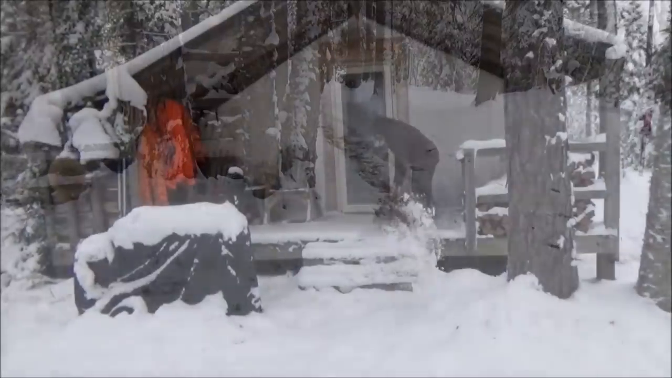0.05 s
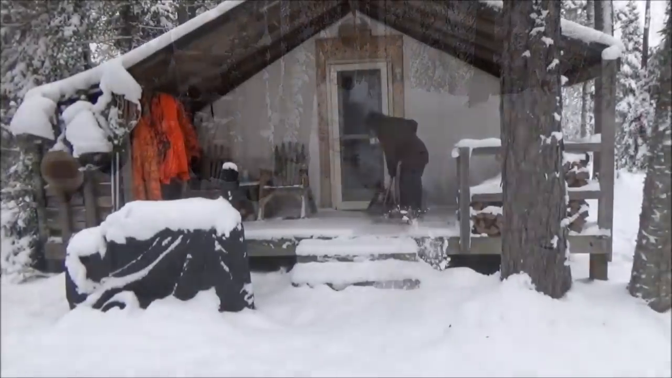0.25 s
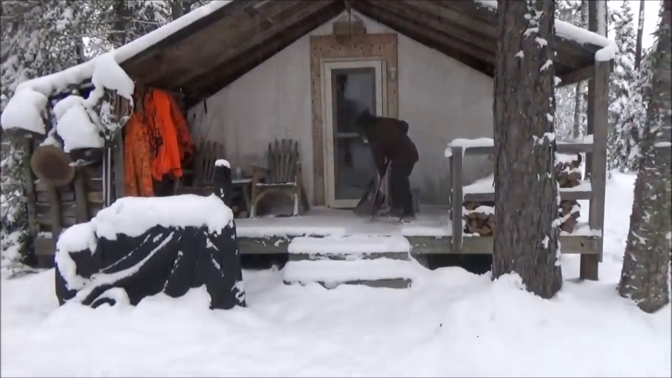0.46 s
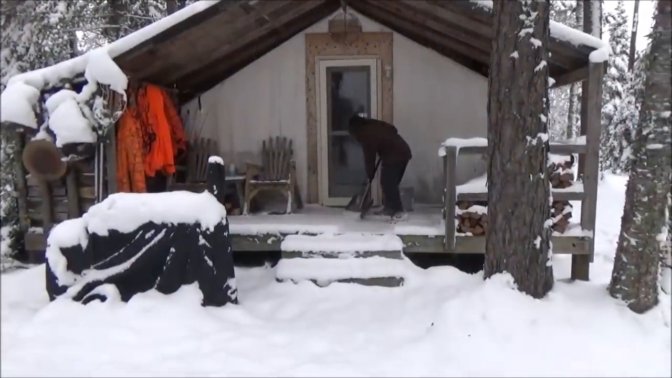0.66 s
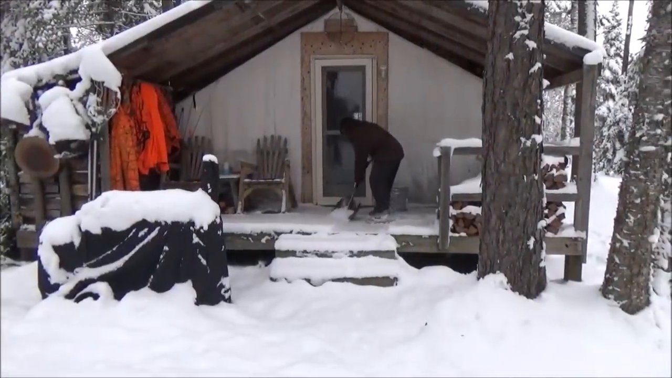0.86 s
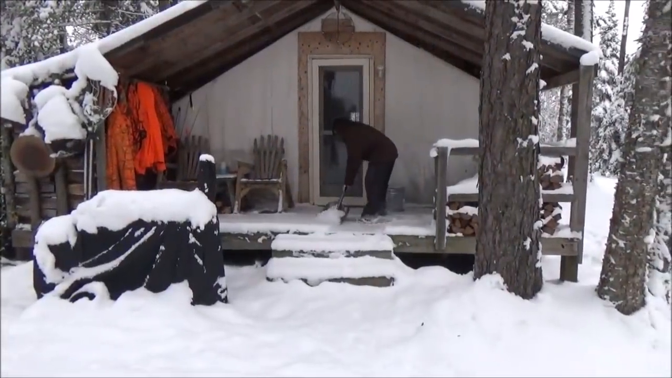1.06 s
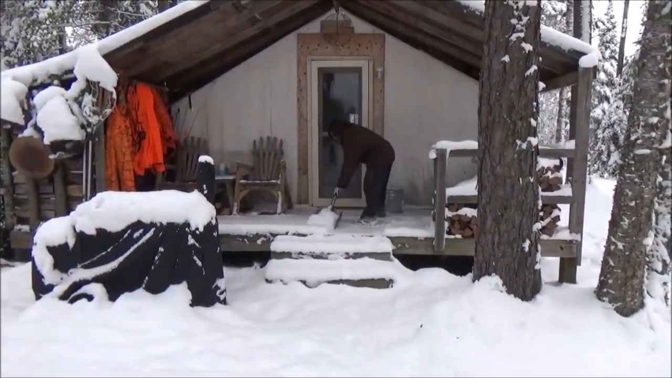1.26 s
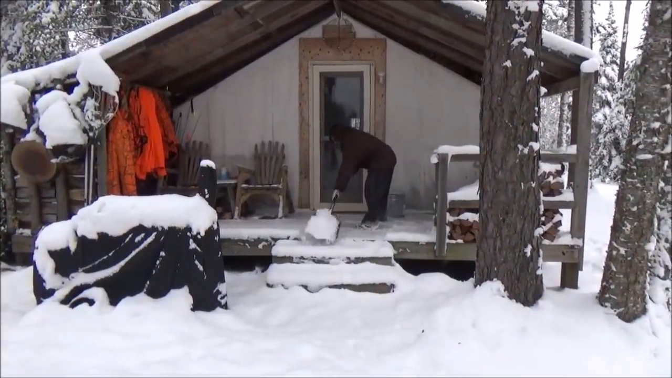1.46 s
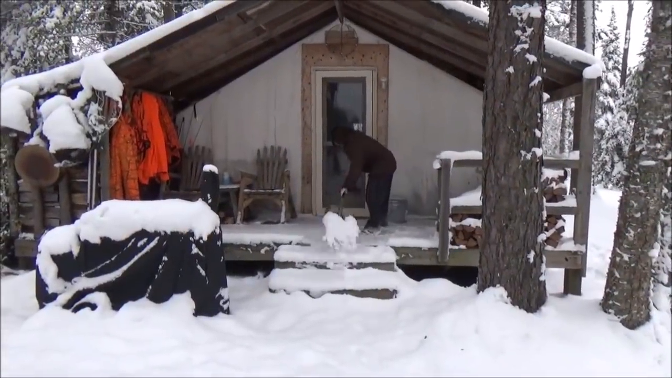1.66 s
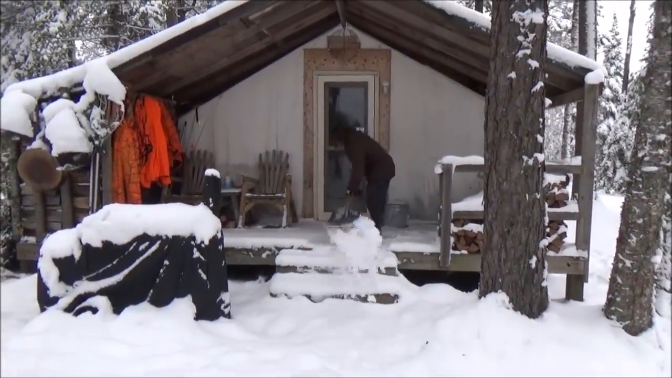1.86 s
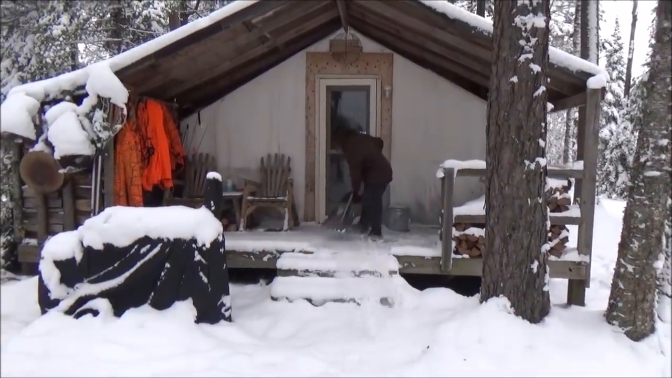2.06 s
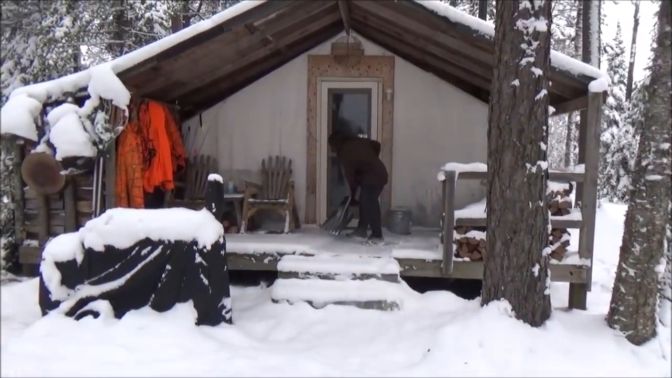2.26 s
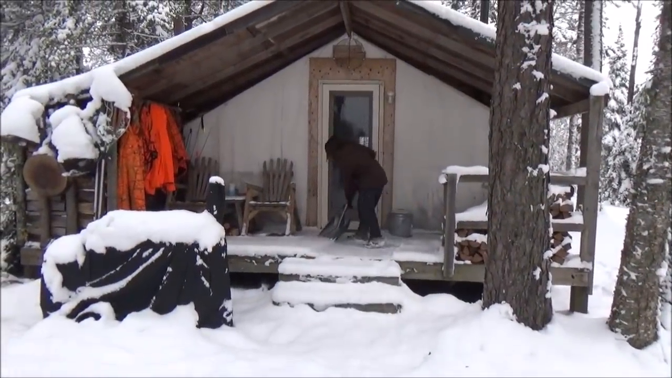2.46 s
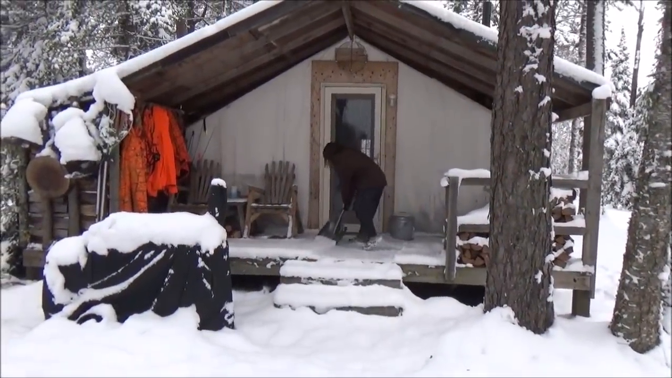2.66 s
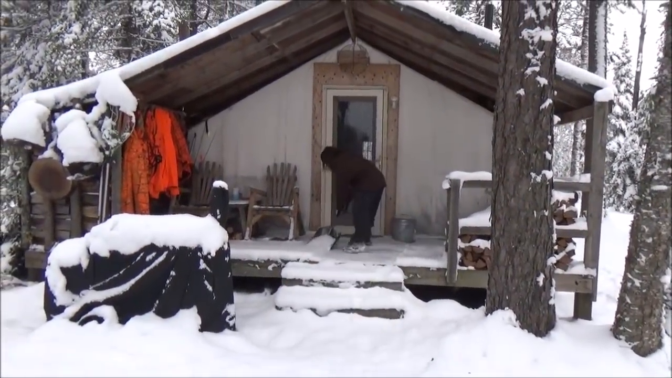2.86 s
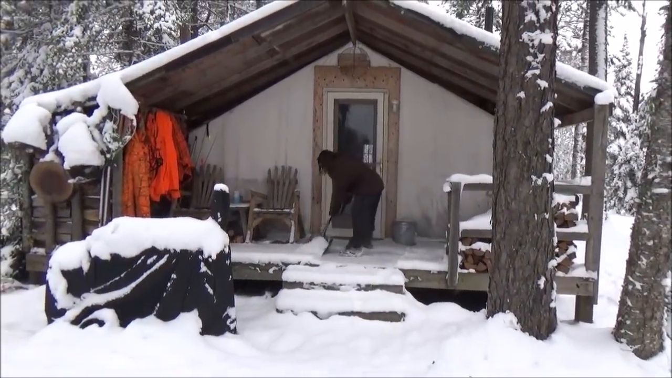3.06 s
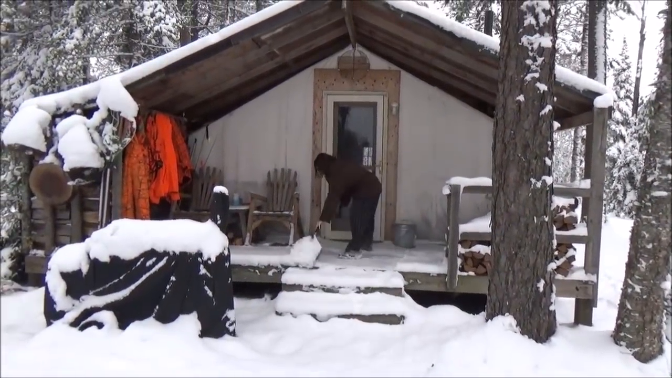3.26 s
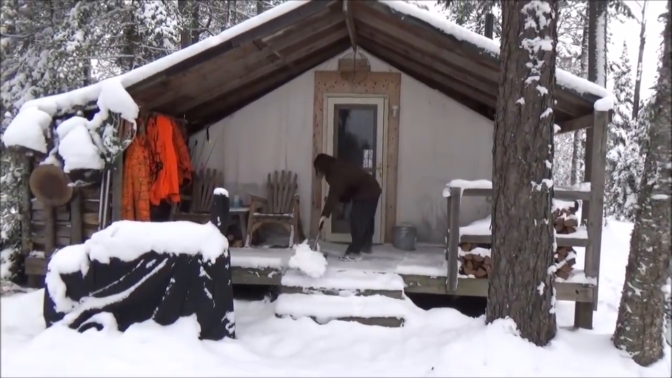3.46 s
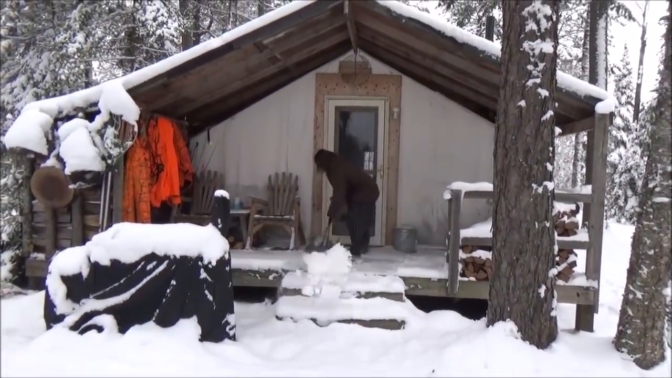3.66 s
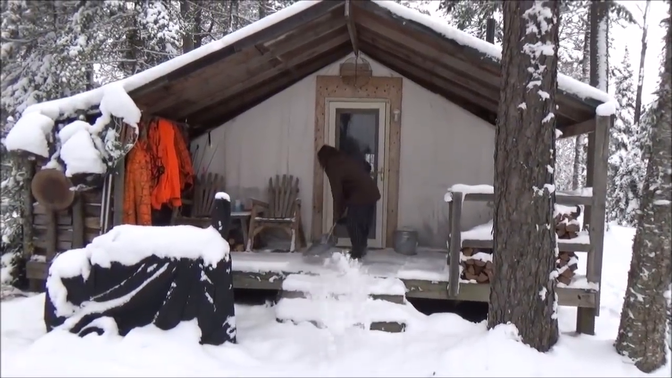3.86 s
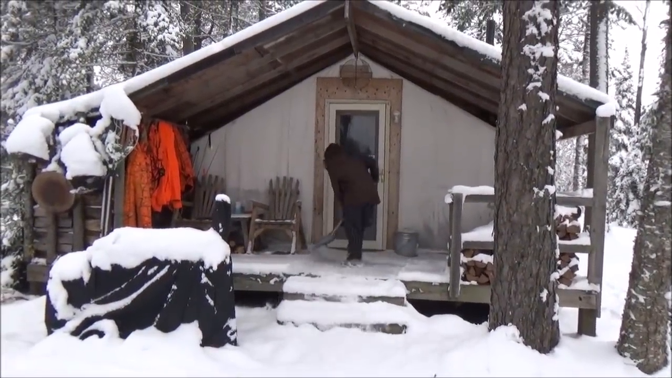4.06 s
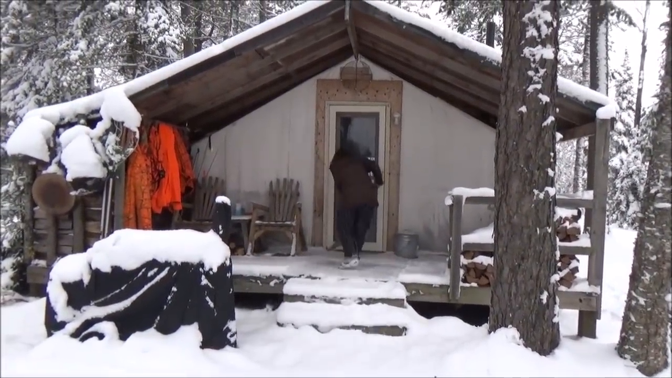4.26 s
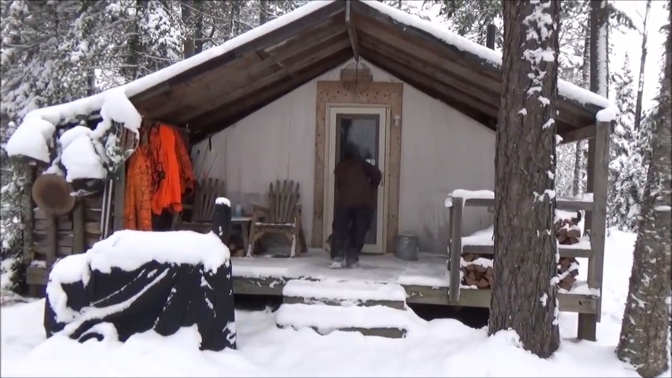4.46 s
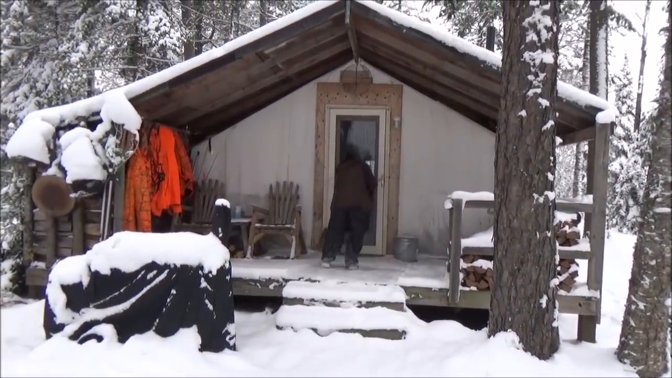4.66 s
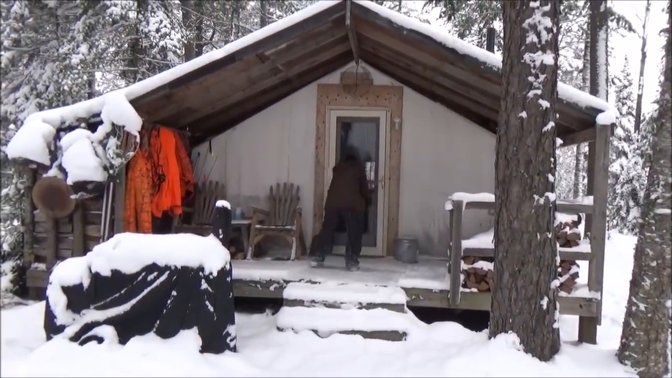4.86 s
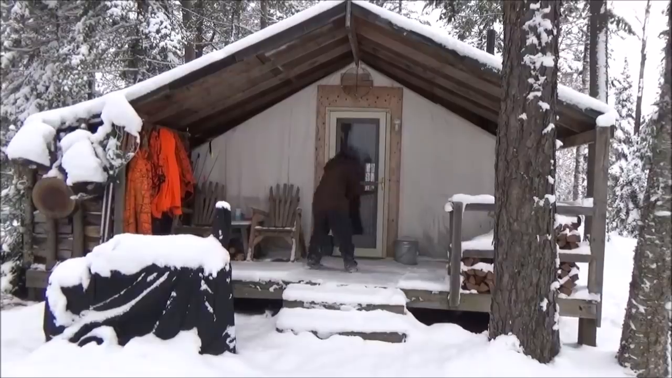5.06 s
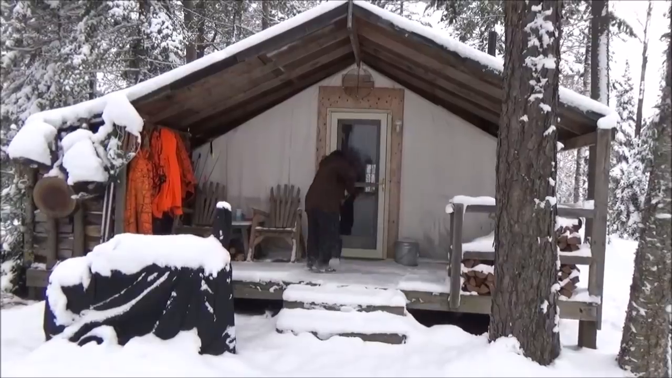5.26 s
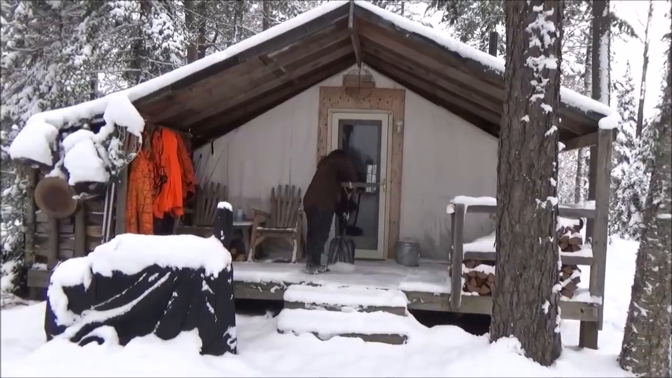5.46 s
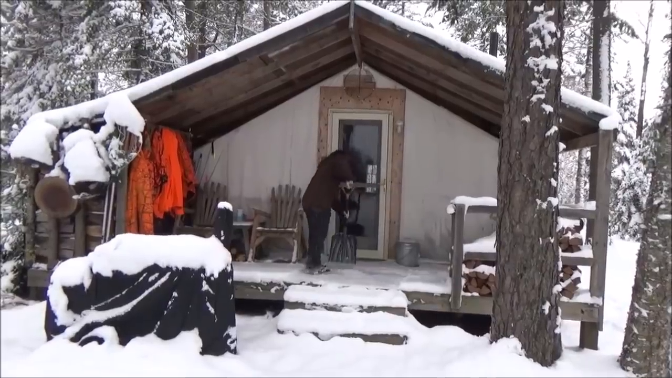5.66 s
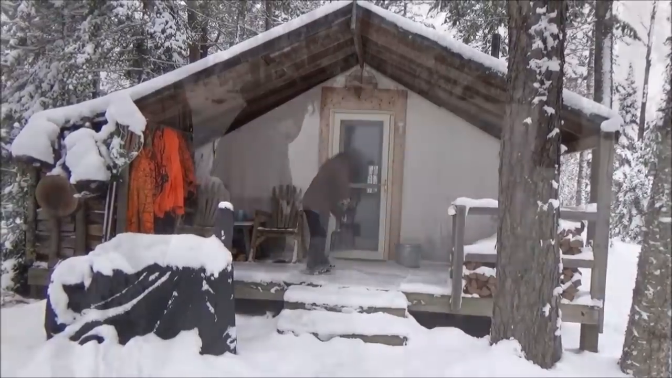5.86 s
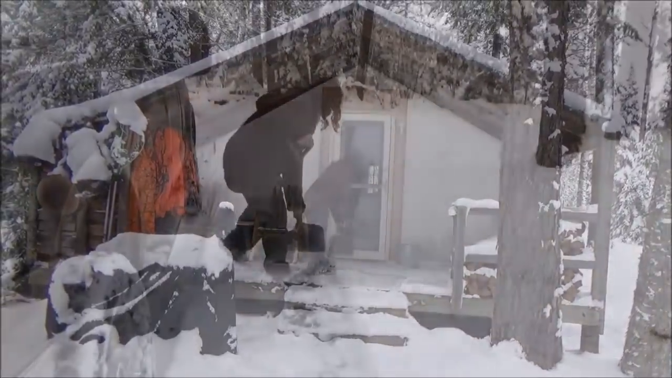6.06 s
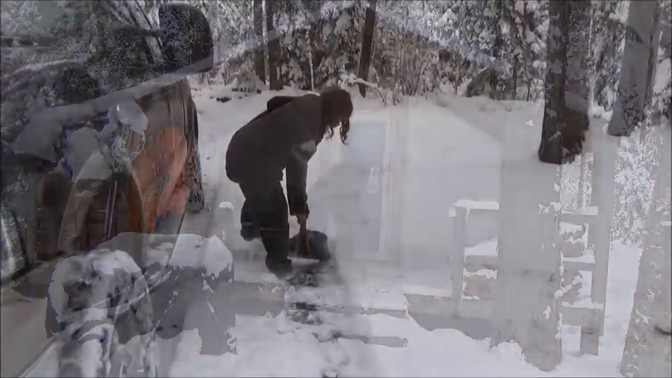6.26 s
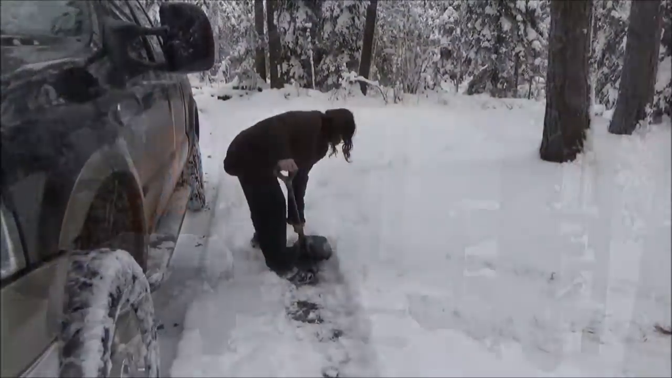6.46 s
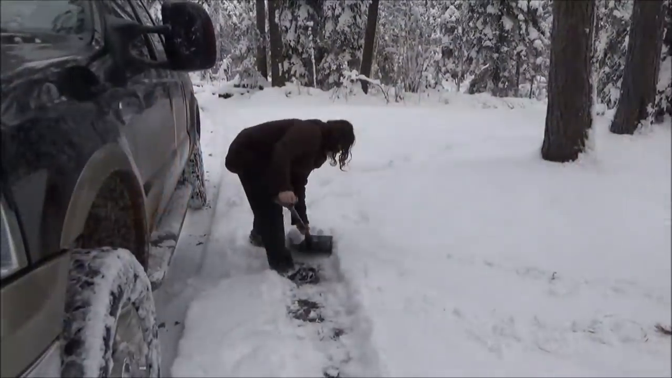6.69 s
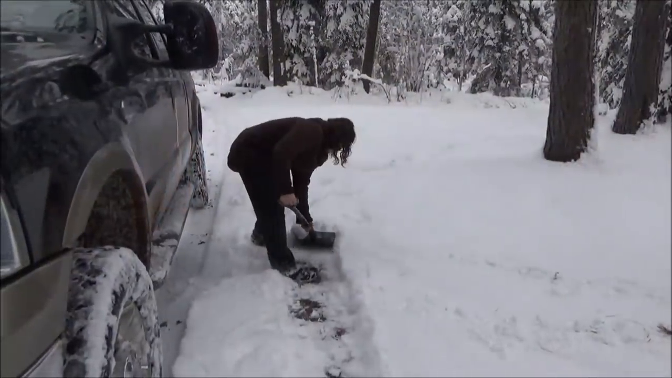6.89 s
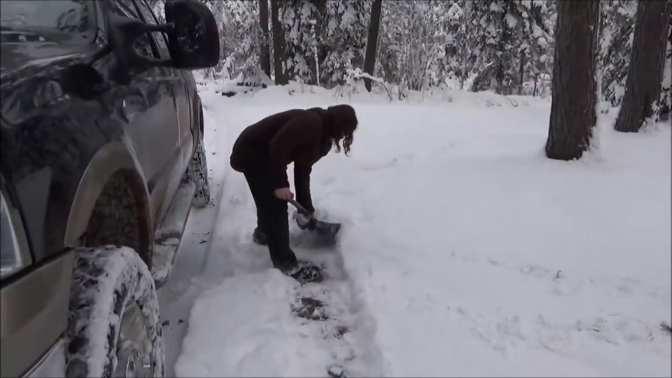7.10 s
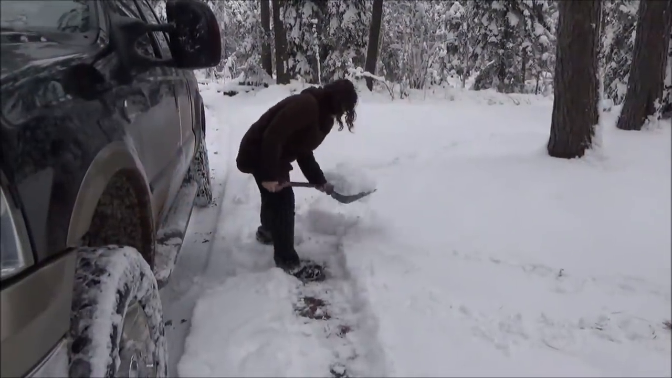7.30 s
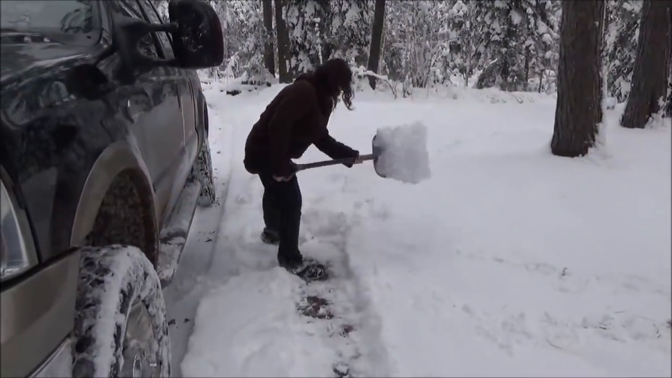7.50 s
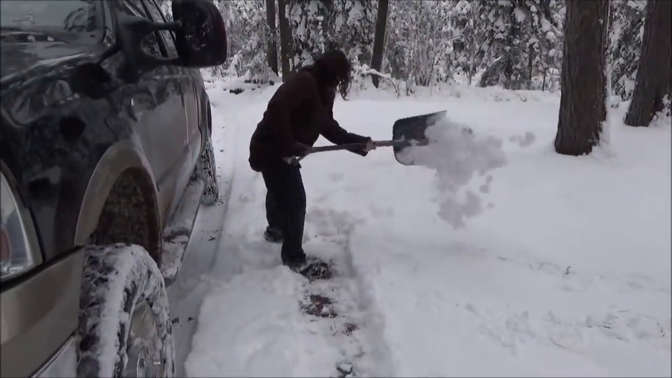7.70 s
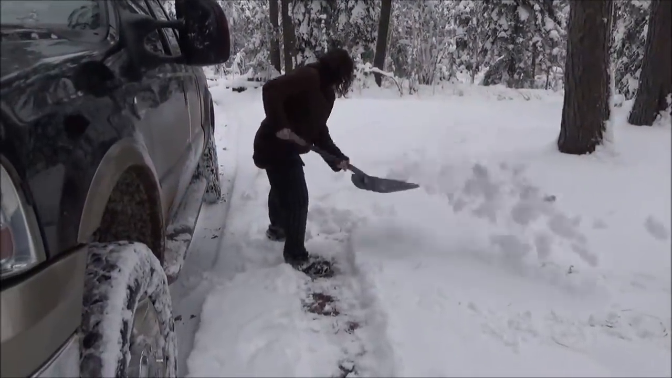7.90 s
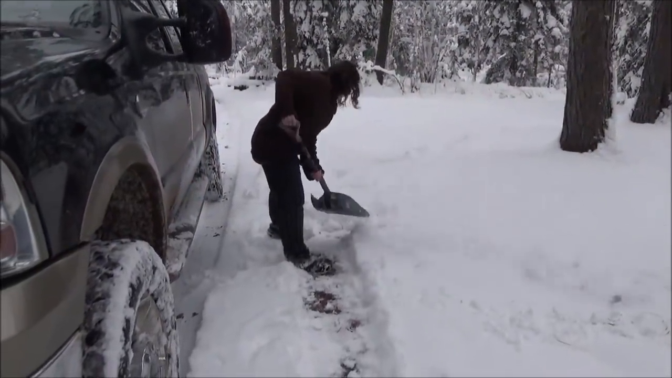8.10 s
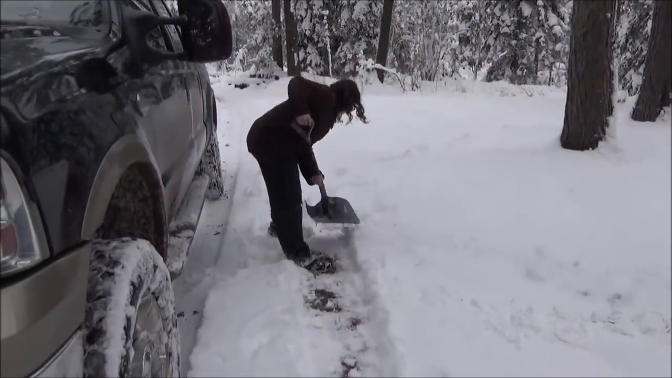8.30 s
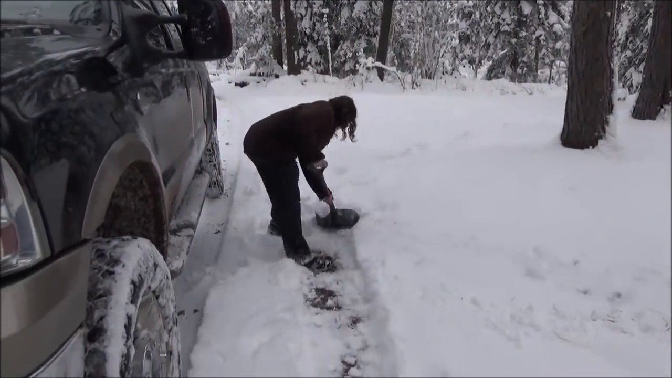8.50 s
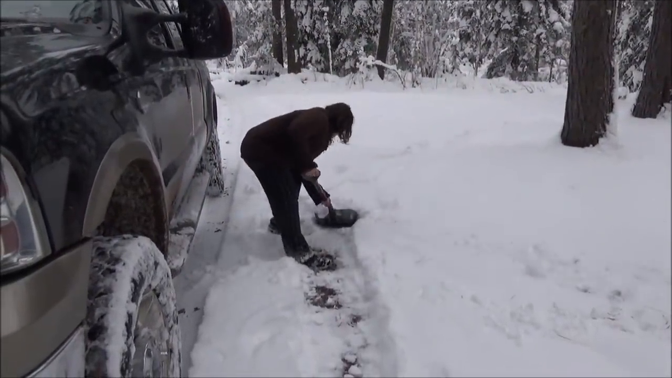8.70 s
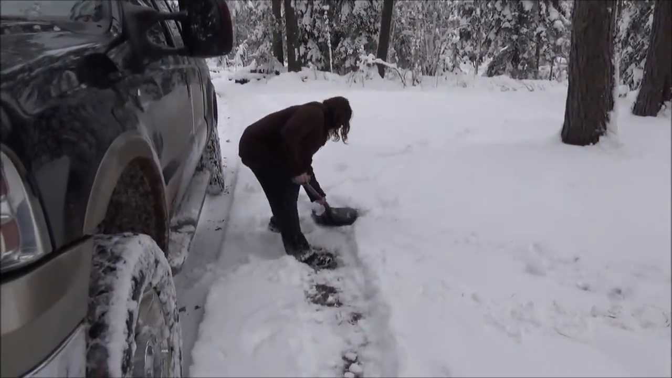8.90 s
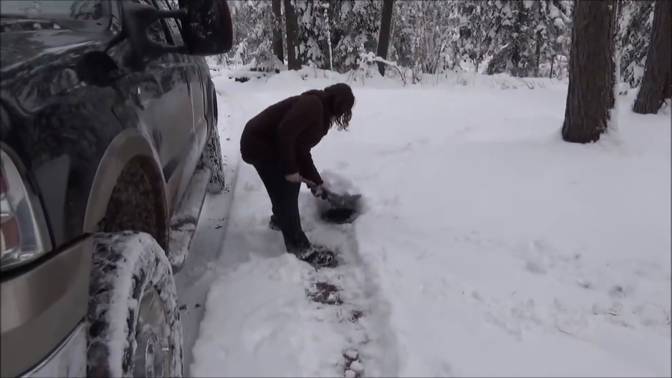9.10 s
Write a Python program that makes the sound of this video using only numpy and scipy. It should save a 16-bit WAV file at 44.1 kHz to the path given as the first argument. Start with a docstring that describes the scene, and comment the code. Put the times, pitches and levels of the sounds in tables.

```python
"""Snow shovel on porch boards

A shovel is pushed over the boards in four juddering strokes, then stabbed into loose snow. Pressure on the edge
sets the level of crushing ice grains and of the noise that rings modes of blade and deck. Between strokes, grain
noise swells as snow slides and boots shuffle; knocks ring board modes, ice crust snaps in noise bursts, wind hums
and gusts on the microphone, a faint camera part ticks from 6.4 s on, and air and recorder hiss lie below."""
import sys
import numpy as np
from scipy import signal
from scipy.fft import rfft, irfft, next_fast_len
from scipy.io import wavfile

SR = 44100
rng = np.random.default_rng(int(sys.argv[2]) if len(sys.argv) > 2 else 0)


def to_wav(sig):
    """Store sig (one row per channel, or 1-D mono) as 16-bit WAV at the path in sys.argv[1].

    Samples outside -1..1 are clipped; the rate is SR.
    """
    pcm = np.clip(np.atleast_2d(sig), -1, 1) * 32767
    pcm = np.round(pcm).astype(np.int16)
    wavfile.write(sys.argv[1], SR, pcm.T)  # frames by channels


N = 403019

# blade modes under friction: mode_hz, width_hz, rel_db
BLADE_MODES = [(349, 30, -7.5), (392.5, 56, -1.5), (422.7, 28.2, 6.5), (456.7, 31, 0.5), (507, 35, -6.5)]
# higher, duller blade modes: mode_hz, width_hz, rel_db
SCOOP_MODES = [(526, 59, 0.5), (666.5, 83, 4.5), (730, 120, 4), (885, 400, -11.5)]


def shovel():
    """The pressure on the edge sets the crushing of grains and the noise that rings blade and deck."""
    # one table a stroke: time_s, steady_scrape_db, rel_treble_db
    strokes = [
        [(0.54, -65, 22.5), (0.608, -44.5, 1.5), (0.758, -23.5, -3), (0.854, -24.5, -2.5), (1.228, -27.5, -1),
         (1.278, -21.5, 3.5), (1.398, -20.5, 0), (1.5, -44.5, -26)],
        [(2.45, -46.5, 8.5), (2.522, -39.5, 1), (2.646, -27.5, -1.5), (2.744, -22, -2), (3.166, -23.5, 1.5),
         (3.294, -30, 3), (3.38, -56, -1)],
        [(4.805, -41, 4), (4.861, -42, -3.5), (4.979, -30.5, -1), (5.397, -18, -6.5), (5.437, -42, -4),
         (5.557, -26.5, -9), (5.639, -42.5, -37), (5.72, -59, -22)],
        [(6.21, -71, 2.5), (6.272, -35.5, -5), (6.394, -28, 2), (6.576, -14, -3.5), (6.632, -12.5, -1.5),
         (6.734, -30.5, 3.5), (6.884, -29.5, -2.5), (6.98, -63, -5.5)],
        [(8.375, -51.5, 12), (8.533, -31, 8), (8.62, -64, 12)],
    ]
    # drive of the bodies against the scrape, a row a stroke: ring_db, scoop_db, boom_db, fullest_ring_s
    stroke_body = [(-0.5, 6, -7, 0.88), (0.5, 7.5, -4, 2.77), (6.5, 5, 4.5, 5.64), (3, 4, 4, 6.53),
                   (-11.5, -7, 1.5, 8.5)]
    # freer ringing under a light push, dB per dB of push below firm: blade, scoop, deck
    freer_db_per_db = (0.25, 0.067, 0.19)
    # ring lost per second away from the fullest moment, dB/s: blade, scoop
    ring_loss_db_per_s = (11, 2.5)
    # crushing spectrum: freq_hz, rel_db_per_hz
    grit_spectrum = [(60, 9.5), (150, -13), (300, -17.5), (600, -8.5), (1000, -8.5), (2240, -10),
                     (2970, -9.5), (5840, -13), (9400, -12.5), (11500, -19.5)]
    # upper edge modes: mode_hz, width_hz, rel_db
    edge_modes = [(1062, 20, 6), (1200, 130, -12), (1790, 410, 0.5), (2642, 19, 5), (2840, 270, -3),
                  (3430, 36, -30), (9160, 960, 1.5)]
    # board modes: mode_hz, width_hz, rel_db
    deck_modes = [(49, 21, -34), (103, 22.3, -0.5), (195, 42, -4), (314, 74, -7)]
    firm_db, edge_db, ring_base_db, scoop_base_db, boom_base_db = -30, -9, -4.5, -13.5, -16

    t = np.arange(N) / SR
    gate, steady_db, treble_db = in_time(strokes)
    # body settings switch 0.1 s after a stroke ends
    stroke = np.searchsorted([rows[-1][0] for rows in strokes[:-1]], t - 0.1)
    *body_db, fullest_s = np.transpose(stroke_body)[:, stroke]
    away_s = np.minimum(np.abs(t - fullest_s), 1)
    freer_db = np.outer(freer_db_per_db, firm_db - steady_db)
    loss_db = np.outer([*ring_loss_db_per_s, 0], away_s)
    ring_db, scoop_db, boom_db = body_db + freer_db - loss_db

    pressure, drive = edge_pressure(gate * from_db(steady_db))
    crush = pressure * grains(per_s=21000, spread_db=1)
    grit = colour(skin(crush, 253.0, 11420, count=52), grit_spectrum)
    grit += from_db(edge_db) * resonate(crush, edge_modes)
    dull = signal.sosfilt(signal.butter(1, 4000, fs=SR, output="sos"), grit)
    scrape = dull + from_db(treble_db) * (grit - dull)

    shake = np.array([drive, drive, pressure]) * rng.standard_normal((3, N))
    blade = resonate(shake[0] * from_db(ring_base_db + ring_db), BLADE_MODES)
    scoop = resonate(shake[1] * from_db(scoop_base_db + scoop_db), SCOOP_MODES)
    deck = resonate(shake[2] * from_db(boom_base_db + boom_db), deck_modes)
    return scrape + blade + scoop + deck


def edge_pressure(steady):
    """Judders and bites add power to the steady push: pressure on the grains, and drive of the blade."""
    # edge loads up and slips free: peak_s, level_db, half_power_length_ms, rel_blade_drive_db
    judders = [(0.611, -27.5, 22, 3), (0.697, -21, 25, 0), (0.737, -16, 22, -3), (0.814, -18.5, 20, 1),
               (0.852, -15.5, 19, 4), (0.911, -24.5, 20, 8), (0.987, -15.5, 30.5, -0.5),
               (1.049, -20.5, 17, -12), (1.089, -16.5, 11, -18), (1.152, -20.5, 55, -10),
               (1.221, -20.5, 47, -7), (1.348, -21, 30, -3), (2.514, -24, 23.4, 4), (2.574, -15.5, 14, 0.5),
               (2.65, -19.5, 7.3, 6.5), (2.692, -20, 20, 1.5), (2.743, -19, 47, -9), (2.817, -16, 15, -11),
               (2.866, -15, 34, -6), (2.926, -18.5, 23, -1), (2.974, -21, 14, 1), (3.019, -21.5, 16, 2.5),
               (3.117, -17.5, 24, 4.5), (3.205, -16.5, 26, 0.5), (4.886, -30, 33, -5),
               (5.222, -15, 31, -1.5), (5.297, -11.5, 22, -4.5), (5.334, -11, 4.7, -1),
               (5.357, -17, 8.6, 8), (5.416, -11.5, 18, 4.5), (5.469, -12, 34, -1.5), (5.508, -15, 24, -5),
               (5.547, -16, 12.3, -3.5), (6.388, -26.5, 36, -9), (6.495, -17.5, 13, 0),
               (6.519, -19, 10, 10), (6.565, -14.5, 18, 2), (6.667, -15, 34, -7), (6.728, -19, 73, 2.5),
               (6.846, -21, 23, 4), (8.526, -26, 4, 0.1)]
    # edge bites down at once, lets go slowly: peak_s, level_db, half_power_fall_ms
    bites = [(0.551, -51.5, 37), (0.675, -24, 22), (0.897, -16, 16), (2.463, -41, 57), (3.275, -25.5, 34.5),
             (4.817, -22, 16.6), (4.949, -26, 8.9), (6.22, -31, 12), (6.26, -24, 15.3), (6.43, -18.5, 25),
             (8.417, -22.5, 23), (8.472, -28, 26)]
    loading_share = 0.59  # part of a judder spent rising
    bite_rise_ms, bite_drive_db, tremble_db = 4, 2.5, 0.7

    t = np.arange(N) / SR
    power = np.array([steady ** 2] * 2)
    catches = [(s, db, loading_share * ms, (1 - loading_share) * ms, drive_db)
               for s, db, ms, drive_db in judders]
    catches += [(s, db, bite_rise_ms, ms, bite_drive_db) for s, db, ms in bites]
    for peak_s, level_db, rise_ms, fall_ms, drive_db in catches:
        near = slice(round((peak_s - 0.1) * SR), round((peak_s + 0.12) * SR))
        late_ms = 1000 * (t[near] - peak_s)
        # dB doubled, as from_db gives amplitude and power is wanted
        shape_db = 2 * level_db - 6 * (late_ms / np.where(late_ms < 0, rise_ms, fall_ms)) ** 2
        power[:, near] += from_db([shape_db, shape_db + 2 * drive_db])
    return np.sqrt(power) * from_db(tremble_db * drift(65))


def skin(clicks, low_hz, high_hz, count):
    """Each grain strikes another spot of the blade and rings one small mode; the sum has a flat spectrum."""
    sharpness = 32  # mode Hz over width Hz
    own_wander_db, shared_wander_db = 2, 2.0  # shared by six neighbours as the contact moves along the edge
    dealt = rng.integers(0, count, N)
    shared = [drift(10.8) for _ in range(count // 6 + 1)]
    rings = 0
    for k, hz in enumerate(np.geomspace(low_hz, high_hz, count)):
        strength = from_db(own_wander_db * drift(12.2) + shared_wander_db * shared[k // 6])
        rings = rings + resonance(clicks * (dealt == k) * strength, hz, hz / sharpness)
    return rings * np.sqrt(2 * sharpness * np.log(high_hz / low_hz) / np.pi)


def sliding_snow():
    """Loose snow slides and sprays as swells of fine grains."""
    # top_s, top_db, rise_s, fade_s
    slides = [(0.33, -52.5, 0.14, 0.11), (0.51, -60, 0.066, 0.04), (1.615, -38.5, 0.12, 0.14),
              (1.74, -48, 0.087, 0.056), (1.96, -58.5, 0.12, 0.1), (2.16, -51, 0.13, 0.19),
              (3.53, -39.5, 0.25, 0.15), (4.03, -49, 0.14, 0.16), (4.455, -50.5, 0.06, 0.09),
              (4.575, -49, 0.14, 0.059), (5.685, -57, 0.076, 0.081), (5.91, -67, 0.04, 0.09),
              (6.915, -47, 0.07, 0.039), (7.065, -52, 0.11, 0.096), (7.55, -54.5, 0.35, 0.16),
              (7.765, -45, 0.061, 0.088), (7.835, -39, 0.07, 0.058), (7.95, -44, 0.023, 0.099),
              (8.05, -46.5, 0.15, 0.23), (8.365, -52.5, 0.04, 0.032), (8.655, -48, 0.034, 0.066),
              (8.795, -45.5, 0.11, 0.081), (8.995, -48, 0.15, 0.11)]
    # freq_hz, rel_db_per_hz
    spray_spectrum = [(300, -32), (850, -14), (1700, -15.5), (3950, -5.5), (5260, -9.5), (9180, -2),
                      (11500, -9.5)]
    level = swells(*np.transpose(slides)) * from_db(1.23 * drift(30))
    return level * colour(grains(per_s=3500, spread_db=0.75), spray_spectrum)


def boot_scuffs():
    """Boots drag as duller grains, while noise of the same swells hums in the carried blade's modes."""
    # top_s, top_db, rise_s, fade_s, rel_blade_hum_db
    scuffs = [(0.06, -57.5, 0.022, 0.14, -3), (0.34, -53.5, 0.16, 0.21, 1), (0.44, -61, 0.029, 0.19, 9),
              (1.6, -50.5, 0.26, 0.16, -0.5), (1.9, -63, 0.02, 0.06, 10.5),
              (2.072, -50.5, 0.0088, 0.023, -3), (2.33, -50.5, 0.18, 0.047, 0), (2.42, -54, 0.03, 0.04, 4),
              (3.5, -52, 0.59, 0.17, -2), (3.83, -56, 0.12, 0.019, 8.5), (4.053, -54, 0.0093, 0.16, -12),
              (4.15, -51.5, 0.059, 0.12, 1.5), (4.28, -56, 0.03, 0.05, 5), (4.37, -56, 0.05, 0.05, -3),
              (4.45, -49.5, 0.076, 0.066, -4), (4.575, -44.5, 0.12, 0.075, -21),
              (5.7, -52, 0.098, 0.043, 5), (5.9, -51, 0.062, 0.18, -6), (6.05, -48.5, 0.022, 0.014, 2),
              (6.13, -52.5, 0.056, 0.11, 7), (7.07, -65, 0.06, 0.08, -22), (7.6, -61, 0.077, 0.11, 6.5),
              (7.76, -54, 0.064, 0.035, 2), (7.84, -47, 0.035, 0.13, -10), (8.06, -54, 0.15, 0.12, -4),
              (8.68, -58, 0.08, 0.11, -14), (8.9, -62, 0.1, 0.17, -12)]
    # freq_hz, rel_db_per_hz
    shuffle_spectrum = [(200, -19), (500, -14), (730, -20.5), (1330, -16.5), (3000, -20.5), (5340, -30.5),
                        (11500, -37)]
    top_s, top_db, rise_s, fade_s, hum_db = np.transpose(scuffs)
    drag = swells(top_s, top_db, rise_s, fade_s) * from_db(1.7 * drift(45))
    shuffle = drag * colour(grains(per_s=6000, spread_db=0.74), shuffle_spectrum)
    brush = swells(top_s, top_db + hum_db, rise_s, fade_s) * from_db(2.3 * drift(28))
    return shuffle + resonate(brush * rng.standard_normal(N), BLADE_MODES + SCOOP_MODES)


def treads():
    """Weight shifts on boards and ground rumble as swells of low noise."""
    # top_s, top_db, length_s
    shifts = [(0.2, -55, 0.08), (0.366, -48, 0.08), (0.46, -48, 0.13), (1.605, -49, 0.13),
              (2.357, -47, 0.24), (3.543, -51, 0.14), (3.697, -47, 0.21), (3.88, -57, 0.1),
              (4.058, -55, 0.17), (4.476, -51, 0.29), (5.66, -51.5, 0.12), (5.924, -46, 0.068),
              (6.139, -59, 0.12), (7.058, -52.5, 0.15), (7.806, -47.5, 0.39), (8.191, -52, 0.094),
              (8.71, -50, 0.4), (8.856, -51, 0.12)]
    # freq_hz, rel_db_per_hz
    rumble_spectrum = [(20, -8), (60, -16), (105, -0.5), (160, -6), (300, -21), (600, -63), (2000, -61)]
    top_s, top_db, length_s = np.transpose(shifts)
    level = swells(top_s, top_db, length_s / 2, length_s / 2) * from_db(2.9 * drift(2.7))
    return level * colour(rng.standard_normal(N), rumble_spectrum)


def knocks():
    """Boots and blade knock the boards: the same modes ring, most those near a centre, with a short crack."""
    # start_s, level_db, centre_hz, rel_crack_db
    hits = [(0.18, -38.5, 116, -5), (0.348, -34, 218, -17), (0.429, -35.5, 305, -3.5),
            (1.533, -33, 124, -4), (1.581, -30.5, 124, -14), (1.9, -40, 336, -6.5), (2.313, -41, 221, -15),
            (2.345, -34, 101, -3), (3.814, -39, 110, -6), (4.052, -51, 124, 14), (4.325, -41.5, 382, -1),
            (4.368, -34.5, 520, -10), (4.814, -13.5, 442, -3), (4.95, -15.5, 410, -24),
            (5.896, -48, 159, 3), (6.046, -37.5, 363, -17), (6.104, -34.5, 135, -7),
            (6.162, -31, 129, -2.5), (6.214, -10, 252, -26), (6.257, -10, 364, -11),
            (7.582, -42.5, 406, -9)]
    # mode_hz, rel_db, t60_s
    modes = [(114, -5.5, 0.22), (223.3, -3.5, 0.11), (255, 4, 0.017), (356, 1, 0.043), (457.4, -14.5, 0.26),
             (640, -7, 0.012), (1050, -12, 0.015)]
    out, t = np.zeros(N), np.arange(SR // 4) / SR
    luck = rng.normal(0, 0.4, (len(hits), len(modes)))  # dB
    crack_band = signal.butter(2, [450, 2200], "band", fs=SR, output="sos")
    cracks = rms_one(signal.sosfilt(crack_band, rng.standard_normal((len(hits), len(t)))))
    for (start_s, level_db, centre_hz, crack_db), luck_db, crack in zip(hits, luck, cracks):
        add(out, start_s, from_db(level_db + crack_db - 60 * t / 0.012) * crack)
        for k, ((hz, db, t60_s), own_db) in enumerate(zip(modes, luck_db)):
            near_db = -4.5 * abs(np.log2(hz / centre_hz))
            gain = from_db(level_db + db + own_db + near_db - 60 * t / t60_s)
            add(out, start_s, (-1) ** k * gain * np.sin(2 * np.pi * hz * t))
    return signal.sosfilt(signal.butter(2, 60, "high", fs=SR, output="sos"), out)


def snaps():
    """Ice crust snaps: short noise bursts in a band, dying fast."""
    # start_s, nominal_peak_db, centre_hz, t60_s, width_octaves
    bursts = [(0.346, -36, 2630, 0.044, 1.4), (0.8174, -27, 2380, 0.022, 0.8),
              (1.4023, -11.5, 1930, 0.1, 0.8), (1.634, -33, 8530, 0.022, 0.8),
              (2.065, -29, 3730, 0.032, 0.32), (5.686, -34, 4000, 0.02, 1.8),
              (6.0505, -18, 3400, 0.011, 0.98), (6.127, -31.5, 4900, 0.018, 0.45),
              (6.164, -46, 2000, 0.023, 1.2), (6.8974, -27, 2780, 0.05, 0.8),
              (7.0736, -32, 5040, 0.057, 0.82), (7.3682, -39, 4630, 0.025, 1.7),
              (7.978, -26, 2540, 0.018, 1.9), (8.3484, -30, 3970, 0.023, 3.2),
              (8.388, -25, 8970, 0.056, 0.8), (8.646, -30.5, 3500, 0.033, 2.6),
              (8.699, -35, 5000, 0.02, 1.8), (8.8213, -34, 3630, 0.02, 1.1), (8.865, -35, 7000, 0.02, 1.2),
              (8.883, -35, 4000, 0.022, 1.8)]
    out, t = np.zeros(N), np.arange(SR // 10) / SR
    noises = rng.standard_normal((len(bursts), len(t)))
    for (start_s, peak_db, hz, t60_s, octaves), noise in zip(bursts, noises):
        half = 2 ** (octaves / 2)
        band = signal.butter(1, [hz / half, hz * half], "band", fs=SR, output="sos")
        # noise rms starts 8 dB under the nominal peak
        add(out, start_s, from_db(peak_db - 8 - 60 * t / t60_s) * rms_one(signal.sosfilt(band, noise)))
    return out


def wind():
    """A wavering near-sine, as of vortices shed at an edge, over lumpy gusts on the microphone."""
    # time_s, pitch_hz, level_db
    hum_course = [(7.58, 147, -62), (7.68, 130, -44), (7.766, 130, -53), (7.81, 154, -50),
                  (7.87, 140.5, -45), (7.906, 159, -36), (7.97, 147, -45.5), (8.142, 147.2, -46.5),
                  (8.21, 178.5, -39), (8.264, 170, -60)]
    # top_s, top_db, rise_s, fade_s
    gusts = [(6.95, -50, 0.05, 0.066), (7.14, -45.5, 0.1, 0.065), (7.335, -40, 0.023, 0.034),
             (7.39, -48.5, 0.04, 0.15), (7.63, -55, 0.04, 0.2), (7.89, -44, 0.075, 0.02),
             (8.15, -48.5, 0.23, 0.19), (8.59, -36, 0.12, 0.065), (8.66, -36.5, 0.036, 0.1),
             (8.95, -47, 0.1, 0.1), (8.77, -34.5, 0.073, 0.05), (8.845, -34.5, 0.033, 0.042),
             (9.13, -45, 0.031, 0.1)]
    # freq_hz, rel_db_per_hz
    gust_spectrum = [(15, -40), (40, 6), (75, 2.5), (120, -4), (200, -19), (400, -58)]
    gate, pitch_hz, level_db = in_time([hum_course])
    phase = 2 * np.pi * np.cumsum(pitch_hz * (1 + 0.035 * drift(25.7))) / SR
    hum = gate * np.sqrt(2) * from_db(level_db + 2.0 * drift(25)) * np.sin(phase)
    gust_level = swells(*np.transpose(gusts)) * from_db(2.1 * drift(18))
    return hum + gust_level * colour(rng.standard_normal(N), gust_spectrum)


def camera_tick():
    """A tiny part in the camera rings once every picture, as a decaying sine."""
    first_s, ticks_per_s = 6.358, 29.97
    pitch_hz, t60_s, level_db, spread_db = 2735, 0.035, -55, 2
    out, t = np.zeros(N), np.arange(SR // 60) / SR
    starts_s = np.arange(first_s, N / SR, 1 / ticks_per_s)
    for start_s, own_db in zip(starts_s, rng.normal(0, spread_db, len(starts_s))):
        add(out, start_s, from_db(level_db + own_db - 60 * t / t60_s) * np.sin(2 * np.pi * pitch_hz * t))
    return out


def still_air():
    """Still air and recorder hiss: steady coloured noise, one for the middle and one for the sides."""
    # middle: freq_hz, rel_db_per_hz
    middle_spectrum = [(15, -40), (25, -7), (112, 5), (281, -0.5), (412, 1.5), (651, 1), (1300, -8.5),
                       (1710, -6.5), (5970, -17.5), (9200, -11.5), (11000, -23), (14300, -53),
                       (22000, -120)]
    # sides: freq_hz, rel_db_per_hz
    side_spectrum = [(15, -36), (25, -34), (223, -6), (344, -5.5), (740, -1.5), (2160, -10.5), (2640, -10),
                     (3080, -12), (11000, -21.5), (14300, -56), (22000, -120)]
    middle_db, side_rel_db = -58, -4
    middle = from_db(middle_db) * colour(rng.standard_normal(N), middle_spectrum)
    side = from_db(middle_db + side_rel_db) * colour(rng.standard_normal(N), side_spectrum)
    return middle, side


def swells(top_s, top_db, rise_s, fade_s):
    """Gain over time of events that climb and sink over a rounded top; their powers add."""
    depth_db = 12  # gained over the rise time, lost over the fade time
    roundness = 1.29  # 1 = pointed top and straight flanks in dB, 2 = bell
    power, t = np.zeros(N), np.arange(N) / SR
    for top, level_db, rise, fade in zip(top_s, top_db, rise_s, fade_s):
        near = slice(max(round((top - 3 * rise) * SR), 0), round((top + 3 * fade) * SR))
        late_s = t[near] - top
        down_db = depth_db * np.abs(late_s / np.where(late_s < 0, rise, fade)) ** roundness
        power[near] += from_db(2 * (level_db - down_db))
    return np.sqrt(power)


def grains(per_s, spread_db):
    """Random clicks of uneven size; rms 1."""
    sizes = from_db(spread_db * np.minimum(rng.exponential(1, N), 5)) * rng.choice([-1, 1], N)
    return rms_one(sizes * (rng.random(N) < per_s / SR))


def resonate(x, modes):
    """Parallel resonances, alternating signs; each mode's drive wanders by chance; flat noise nears rms 1."""
    wander_db = 3.0
    out = sum((-1) ** k * resonance(x * from_db(db + wander_db * drift(5.6)), hz, width_hz)
              for k, (hz, width_hz, db) in enumerate(modes))
    return out / np.sqrt(sum(from_db(2 * db) * np.pi * width_hz / SR for hz, width_hz, db in modes))


def resonance(x, hz, width_hz):
    """Two-pole resonance, gain 1 on top."""
    r = np.exp(-np.pi * width_hz / SR)
    zeros = (1 - r * r) / 2 * np.array([1, 0, -1])
    poles = [1, -2 * r * np.cos(2 * np.pi * hz / SR), r * r]
    return signal.lfilter(zeros, poles, x + 1e-18)


def colour(x, spectrum):
    """Shapes a flat signal to a spectrum; flat noise keeps its rms."""
    size = next_fast_len(N)
    freq_hz, db = np.transpose(spectrum)
    bins_hz = np.arange(size // 2 + 1) * SR / size
    gain = from_db(np.interp(np.log(bins_hz + 1), np.log(freq_hz), db))
    return irfft(rfft(x, size) * rms_one(gain), size)[..., :N]


def drift(corner_hz):
    """Slow chance: noise at every 40th sample twice through a one-pole low-pass, spread 1."""
    r = np.exp(-2 * np.pi * corner_hz * 40 / SR)
    noise = rng.standard_normal(N // 40 + 502)
    slow = signal.lfilter([1], [1, -2 * r, r * r], noise)[500:]  # skip the run-in
    return np.interp(np.arange(N) / 40, np.arange(len(slow)), rms_one(slow))


def in_time(tables):
    """Columns over time, joined across the tables, after a gate open while a table lasts, with 10 ms ramps."""
    t = np.arange(N) / SR
    time_s, *columns = np.transpose(np.vstack(tables))
    gate = sum(np.clip(np.minimum(t - rows[0][0], rows[-1][0] - t) / 0.01 + 1, 0, 1) for rows in tables)
    return [np.minimum(gate, 1)] + [np.interp(t, time_s, column) for column in columns]


def add(out, start_s, piece):
    """Mixes a short sound in at its start time."""
    i = round(start_s * SR)
    out[i:i + len(piece)] += piece[:N - i]


def from_db(db):
    """Decibels to gain."""
    return 10 ** (np.asarray(db) / 20)


def rms_one(x):
    """Scales to rms 1."""
    return x / np.sqrt(np.mean(x ** 2) + 1e-20)


def scene():
    """Sources lie ahead; weaker unrelated sound, echoing but for wind and hiss, is in opposite phase at the sides."""
    spread_db, wind_spread_db, porch_t60_s = -14, -8.5, 0.15
    ahead, spread = (shovel() + sliding_snow() + boot_scuffs() + treads() + knocks() + snaps()
                     for _ in range(2))
    t = np.arange(SR // 5) / SR
    echoes = rng.standard_normal(len(t)) * from_db(-60 * t / porch_t60_s)
    side = from_db(spread_db) * signal.fftconvolve(spread, echoes / np.linalg.norm(echoes))[:N]
    side += from_db(wind_spread_db) * wind()
    still_middle, still_side = still_air()
    middle = ahead + wind() + still_middle + camera_tick()
    return middle + (side + still_side) * np.array([[1], [-1]])


def record(dry):
    """Peaks are rounded, the top is cut steeply."""
    top_cut = signal.ellip(10, 0.5, 68, 11050, fs=SR, output="sos")  # order, ripple dB, stop dB, Hz
    return signal.sosfilt(top_cut, np.tanh(dry))


dry = scene()
out = record(dry)
to_wav(out)
```